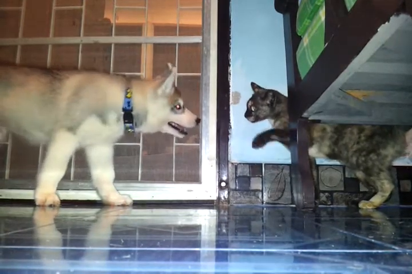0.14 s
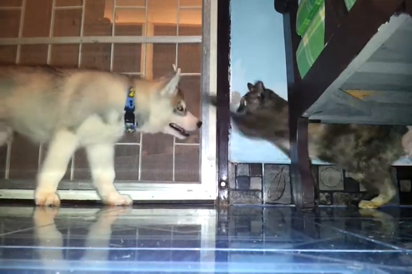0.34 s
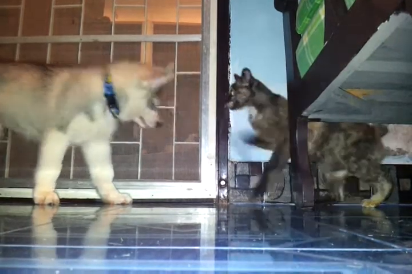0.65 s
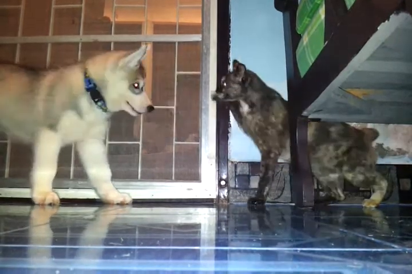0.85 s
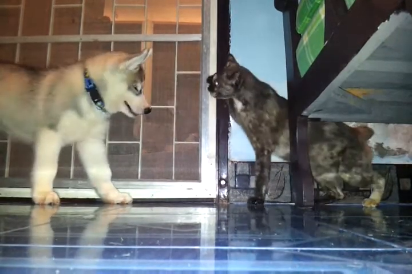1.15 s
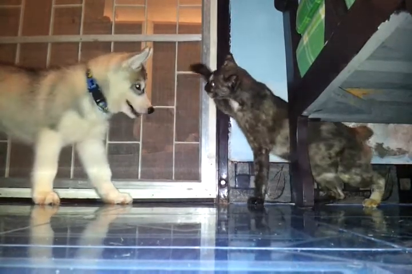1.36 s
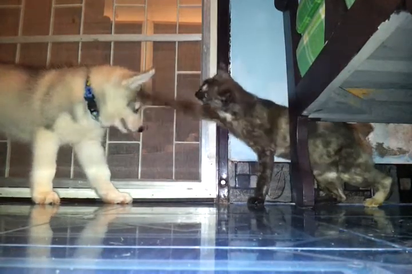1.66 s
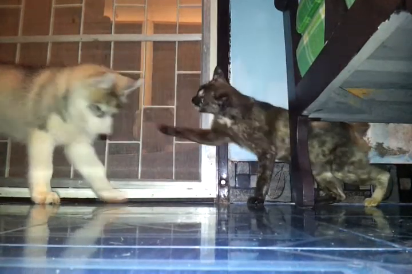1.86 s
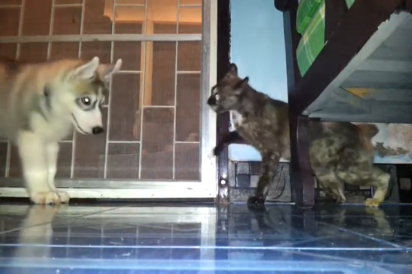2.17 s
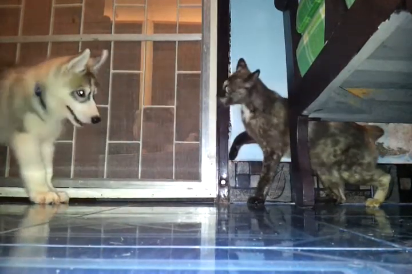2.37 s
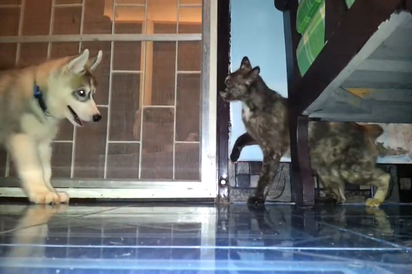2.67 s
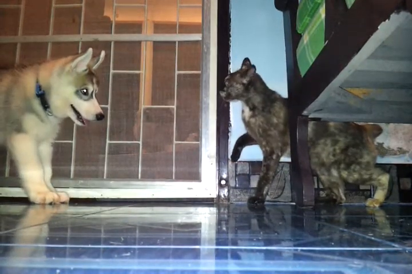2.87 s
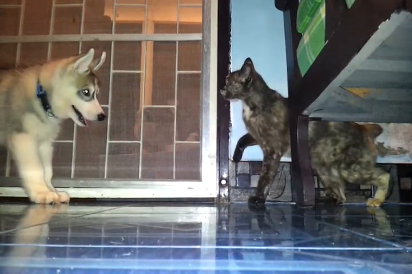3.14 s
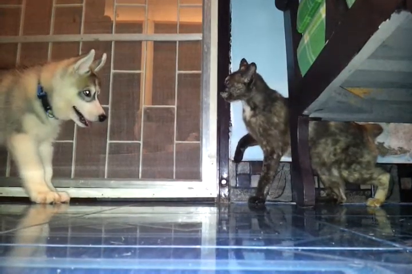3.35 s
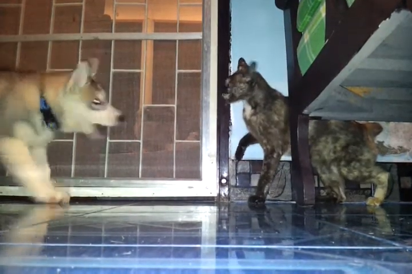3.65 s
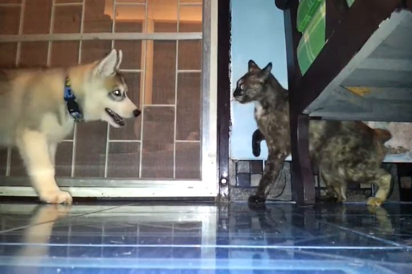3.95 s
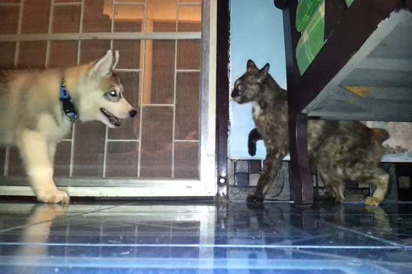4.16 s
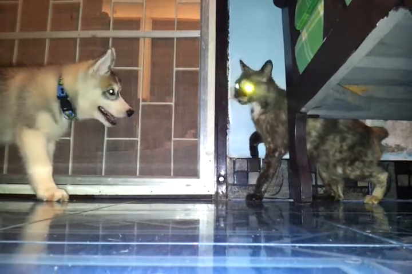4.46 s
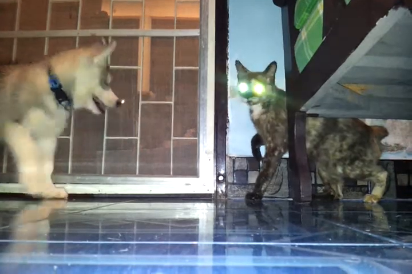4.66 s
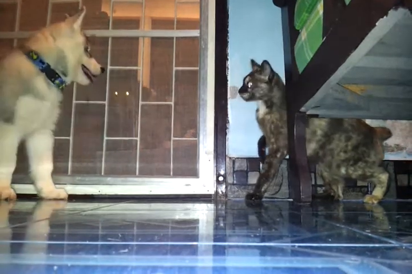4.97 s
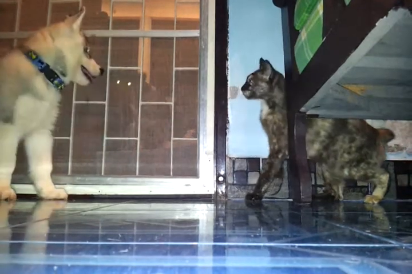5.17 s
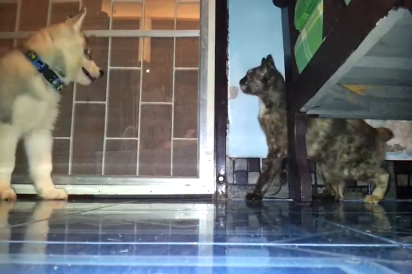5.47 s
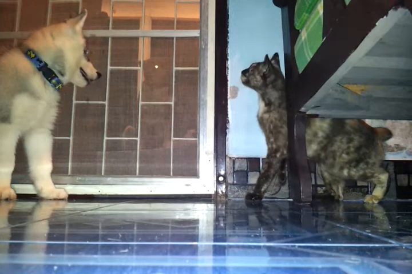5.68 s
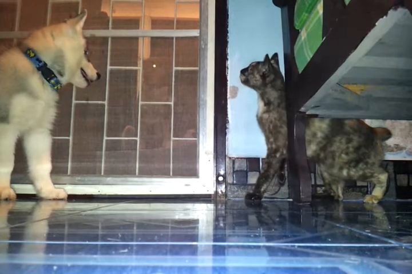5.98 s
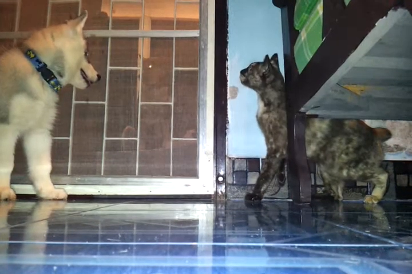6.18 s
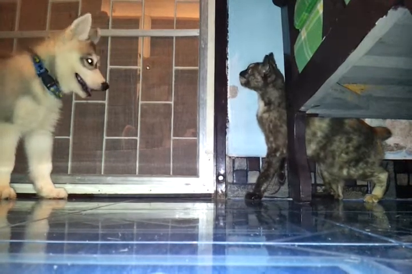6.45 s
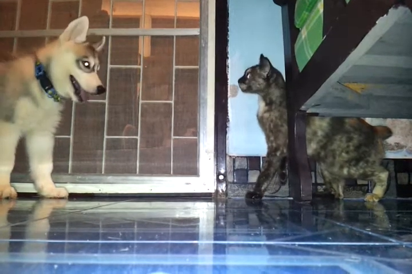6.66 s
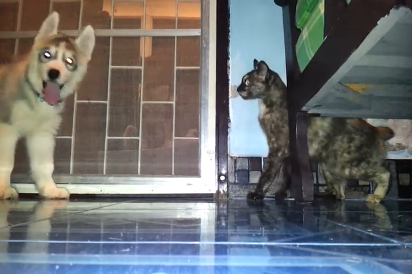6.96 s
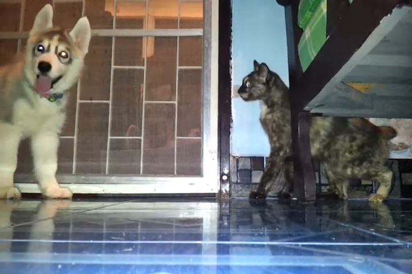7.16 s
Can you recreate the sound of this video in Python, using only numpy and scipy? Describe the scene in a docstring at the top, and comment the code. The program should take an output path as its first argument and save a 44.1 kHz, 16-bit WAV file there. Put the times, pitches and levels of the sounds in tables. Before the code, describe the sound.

A cat and a puppy face off in a reverberant tiled room, heard by a phone on the floor with narrow, slightly clipped sound. Steady hiss and quiet mains hum run throughout. From about 0.3 to 0.6 seconds, low, blunt air thumps strike the microphone; they return at 1.0 and cluster until about 2.2, with a last weak one near 2.5. Through them, from 1.15 to 2.25, the cat yowls: a thin, wavering tone climbing, brightening as its mouth opens, then sagging, with a breathy spit around 1.65. Relative quiet follows. At 3.65 the puppy barks once, short, harsh and overloaded, with a ringing echo. Tiny ticks appear at 4.2 and 4.7, then three sharp, wet smacking clicks at 5.0, 5.2 and 5.4, with small pops among them. Two faint hisses of air come around 5.7. The hum, swelling from about 4.7, dominates to the end at 7.3.

```python
"""A cat and a puppy face off in a tiled room, heard by a phone on the floor over room hiss and mains hum.
First a draught buffets the microphone: random pressure thumps over a slow sway. The cat yowls through it, a
harmonic source in throat and mouth resonances, and spits shaped noise. The puppy then barks once, rough pulses that
overload the phone. Small ticks come before and among three sharp smacking clicks, crackle ringing a small cavity (a
faint one leads); two faint hisses of air follow. The hum swells late; the room echoes and the input stage clips."""
import sys
import numpy as np
from scipy import signal
from scipy.fft import rfft, irfft
from scipy.io import wavfile
from scipy.ndimage import uniform_filter1d

SR = 44100
rng = np.random.default_rng(int(sys.argv[2]) if len(sys.argv) > 2 else 0)


def unload_wav(signal):
    """Save mono or channel-first audio to the path in sys.argv[1] as 16-bit WAV at rate SR, clipped to [-1, 1]."""
    wavfile.write(
        sys.argv[1],
        SR,
        np.round(np.clip(np.atleast_2d(signal).T, -1, 1) * 32767).astype(np.int16),
    )


N = 322812


def gain_of(db):
    """Amplitude ratio: 20 dB is a factor of ten."""
    return 10 ** (np.asarray(db) / 20)


def evened(x):
    """Normalisation: scales a signal to rms 1."""
    return x / np.sqrt(np.mean(x ** 2) + 1e-20)


def read(points, hz):
    """Interpolation of a spectrum along a logarithmic frequency axis."""
    f, value = np.transpose(points)
    return np.interp(np.log(hz + 1), np.log(f + 1), value)


def curves(rows):
    """Linear interpolation in time: gives the start time, then each column sample by sample."""
    s, *columns = np.transpose(rows)
    t = np.arange(s[0], s[-1], 1 / SR)
    return s[0], *(np.interp(t, s, c) for c in columns)


def add(mix, s, sound):
    """Superposition: sums a sound into the mix from s seconds."""
    part = mix[max(round(s * SR), 0):][:len(sound)]
    part += sound[:len(part)]


def resonate(x, hz, width):
    """Heterodyne resonance of gain 1: shifts hz (fixed or moving) to zero, smooths twice, shifts back."""
    turn = np.exp(2j * np.pi * np.cumsum(hz * np.ones(len(x))) / SR)
    r = np.exp(-np.pi * width / SR)  # width is that of each smoothing alone
    smooth = signal.lfilter([(1 - r) ** 2], [1, -2 * r, r * r], x / turn + 1e-18)
    return 2 * (turn * smooth).real


def through(x, modes):
    """Parallel formants: a sum of resonances with alternating sign."""
    return sum((-1) ** k * gain_of(db) * resonate(x, hz, w) for k, (hz, w, db) in enumerate(modes))


def wander(count, ms):
    """Low-passed random modulation of rms 1: noise averaged twice over ms."""
    size = max(round(ms * SR / 1000), 1)
    return evened(uniform_filter1d(uniform_filter1d(rng.standard_normal(count), size), size))


def coloured(spectrum):
    """Spectral shaping: white noise weighted in frequency, then scaled to rms 1."""
    hz = np.fft.rfftfreq(N, 1 / SR)
    return evened(irfft(rfft(rng.standard_normal(N)) * gain_of(read(spectrum, hz)), N))


def thump(hz):
    """Passing eddy: one pointed pressure dip with a few damped swings on both sides, centred in 40 ms."""
    u = np.pi * hz * (np.arange(1764) - 882) / SR
    return -np.cos(2.08 * u) * np.exp(-.9 * (np.sqrt(u ** 2 + 0.049) - np.sqrt(.08)))


def draught():
    """Turbulent pressure: random small eddies and rumble, a slow sway, and the strongest eddies as thumps."""
    # Strength of the air before gusts [start_s, level_db]
    strength = [(0.0, -65), (0.09, -46.5), (0.275, -45.5), (0.295, -32.5), (0.39, -35), (0.47, -27.5),
                (0.6, -31), (0.66, -46.5), (0.97, -40.5), (1.0, -29), (1.16, -33.5), (1.23, -28),
                (1.75, -31.5), (2.13, -30), (2.42, -43), (2.58, -44), (2.62, -53), (2.97, -51.5),
                (3.2, -62), (3.5, -65)]
    # Strongest eddies, one thump each [centre_s, level_db, pitch_hz (nominal)]
    eddies = [(0.3, -17.5, 170), (0.314, -11, 120), (0.364, -24, 170), (0.443, -19.5, 159),
              (0.478, -13.5, 242), (0.515, -17.5, 192), (0.54, -19, 204), (0.602, -19.5, 161),
              (1.005, -10.5, 165), (1.218, -23, 230), (1.229, -13, 197), (1.244, -16, 307),
              (1.281, -19.5, 200), (1.337, -16.5, 196), (1.425, -16.5, 214), (1.503, -10, 249),
              (1.535, -16, 184), (1.555, -15.5, 244), (1.642, -18.5, 186), (1.711, -11.5, 275),
              (1.776, -15.5, 216.7), (1.799, -15.5, 109.1), (1.959, -17, 177), (1.992, -16.5, 214),
              (2.106, -21, 161), (2.13, -9.5, 232), (2.161, -29, 178), (2.478, -21, 148)]
    # Relative spectrum of the rumble [frequency_hz, density_db]
    rumble_spectrum = [(20, -42), (50, -5), (100, 2.5), (170, 0), (330, -17), (500, -21.5), (700, -27.5),
                       (1200, -52.5), (2500, -84)]
    # Relative spectrum of the slow pressure sway [frequency_hz, density_db]
    sway_spectrum = [(10, -13), (25, -12), (45, -5), (80, -20), (200, -52)]
    s, air_db = curves(strength)
    count = len(air_db)
    t = s + np.arange(count) / SR

    # small eddies crowd around each strong one: 14.5 dB under its level, spread over 13 ms
    wakes = sum(gain_of(2 * (db - 14.5)) * np.exp(-((t - at) / 0.013) ** 2) for at, db, hz in eddies)
    gusty_db = air_db + 2.3 * wander(count, 25)
    rumble_db = 10 * np.log10(gain_of(2 * gusty_db) + wakes)  # powers add
    # the sway follows a share of the strength in dB, with gusts of its own
    sway_db = -32 + 0.43 * air_db + 7.5 * wander(count, 40.)

    sizes_hz, eddies_per_s = (94, 127, 170, 214, 280), 220
    small = np.zeros(N)
    for hz in sizes_hz:
        arrivals = rng.random(N) < eddies_per_s / len(sizes_hz) / SR
        train = arrivals * rng.standard_normal(N)
        small += signal.oaconvolve(train, thump(hz), "same")
    rumble = evened(evened(small) + 0.79 * coloured(rumble_spectrum))

    slow = np.clip((-32 - rumble_db) / 18, 0, 1)  # weaker air sheds larger, lower eddies
    dull = evened(resonate(rumble, 74.0, 120.))
    rumble = np.sqrt(1 - 0.71 * slow) * rumble[:count] + np.sqrt(0.83 * slow) * dull[:count]

    out = np.zeros(N)
    add(out, s, gain_of(rumble_db) * rumble)
    add(out, s, gain_of(sway_db) * coloured(sway_spectrum)[:count])
    for at, db, hz in eddies:
        add(out, at - 882 / SR, gain_of(db) * thump(hz))
    return out


def floor():
    """Continuous background: nearly steady room hiss and a mains hum that swells late."""
    # Partials of the hum, relative to its level [frequency_hz, level_db]
    hum_partials = [(50, -13), (100.2, 2), (200.4, -10.5), (300.6, -8.5), (375, -14)]
    # Course of the hum level, shared by all partials [start_s, level_db]
    hum_course = [(0, -61.5), (2.6, -57.5), (4.2, -60.5), (4.7, -55.5), (5.1, -52.5), (6.9, -51),
                  (7.32, -53)]
    # Relative spectrum of the hiss [frequency_hz, density_db]
    hiss_spectrum = [(20, -17.5), (48, -5), (66, -11), (100, -9), (160, -15), (308, -11), (420, -13),
                     (840, -12.5), (2070, -22.5), (5670, -25), (7340, -29), (9500, -93.5), (12400, -105),
                     (20900, -120)]
    t = np.arange(N) / SR
    hum = sum(gain_of(db) * np.sin(2 * np.pi * (hz * t + rng.random())) for hz, db in hum_partials)
    hum_db = np.interp(t, *np.transpose(hum_course)) + .4 * wander(N, 100)
    hum *= np.sqrt(2) * gain_of(hum_db)
    hiss_db = -48 + .5 * wander(N, 40)
    return gain_of(hiss_db) * coloured(hiss_spectrum) + hum


def yowl():
    """Source and filter: clean harmonics pass a fixed throat and a mouth that opens, under a breathy shine."""
    # Voice of the cat [start_s, pitch_hz, throat_db, mouth_db, mouth_hz]
    voice_path = [(1.14, 373.6, -63, -72, 1160), (1.18, 379.4, -46.5, -74, 1170),
                  (1.26, 429.5, -40.5, -75, 1300), (1.33, 446, -48, -72, 1300), (1.4, 458, -56, -64, 1350),
                  (1.47, 444, -40, -50, 1410), (1.52, 448.2, -44, -42.5, 1520),
                  (1.565, 429.5, -47, -49, 1380), (1.61, 432, -37, -46.5, 1730),
                  (1.66, 464.5, -55, -34, 2090), (1.72, 486.8, -69, -34.5, 2110),
                  (1.78, 473.4, -52, -45, 1550), (1.83, 458, -43, -45.5, 1810), (1.89, 474, -51, -41, 1910),
                  (1.95, 479.2, -45, -46.5, 1550), (2.03, 477.6, -48, -46.5, 1610),
                  (2.13, 463, -67, -59, 1450), (2.17, 446.5, -39.5, -59, 1300), (2.21, 421, -47, -66, 1220),
                  (2.24, 427, -74, -74, 1200)]
    # Moving mouth resonances [factor (on mouth_hz), width_hz, level_db (relative to mouth_db)]
    mouth_modes = [(1, 690, 3.5), (1.5, 720, -3)]
    s, hz, throat_db, mouth_db, mouth_hz = curves(voice_path)
    count = len(hz)
    shine_db = -3 + 1.1 * mouth_db  # the shine follows the mouth level
    turns = np.cumsum(hz * (1 + 0.0048 * wander(count, 5.2))) / SR  # phase in cycles, slightly jittered

    def partials(first, last, flutter_db, ms):
        """Fourier sum of harmonics, each fluttering in level on its own."""
        return sum(np.cos(2 * np.pi * k * turns) * gain_of(flutter_db * wander(count, ms))
                   for k in range(first, last + 1))

    low = partials(2, 6, 1.2, 25)
    edge = partials(7, 8, 3.4, 40)
    high = partials(10, 15, 3.5, 15)
    throat = resonate(low, 880, 300)
    mouth = sum(gain_of(db) * resonate(low, factor * mouth_hz, w) for factor, w, db in mouth_modes)
    mouth += gain_of(-24) * edge
    breathy = high + 3.8 * rng.standard_normal(count)
    shine = resonate(breathy, 6240, 590)
    voice = gain_of(throat_db) * throat - gain_of(mouth_db) * mouth + gain_of(shine_db) * shine
    voice *= np.sqrt(2) * gain_of(1.3 * wander(count, 39))
    return s, voice * signal.windows.tukey(count, .03)


def spit(length, db, hz, width):
    """Turbulent jet: a short puff of air as resonant noise that fades in and out."""
    count = round(length * SR)
    return gain_of(db) * evened(resonate(rng.standard_normal(count), hz, width)) * np.hanning(count)


def bark():
    """Driven vocal tract: jittered pulses and gated noise, forced through the open throat."""
    # Resonances of the open throat [frequency_hz, width_hz, level_db (relative)]
    throat_modes = [(69.5, 150, -9.5), (390, 190, -9.5), (968, 318, 4), (1290, 166, 0.5), (1644, 390, -2.5),
                    (2244, 530, -7.5), (2926, 670, -5), (3950, 870, -20.5), (6000, 2300, -24.5)]
    start_s, length_s, level_db, rough = 3.641, .165, 1.5, 0.68
    rise_s, hold_s, close_s, release_db_per_s = .026, .088, .025, 300.
    first_hz, sag_hz_per_s, lowest_hz = 1189.6, 3600., 870  # the pitch sags steadily until it rests

    t = np.arange(0, length_s, 1 / SR)
    effort = np.minimum(t / rise_s, 1) ** 1.6 * np.minimum((length_s - t) / close_s, 1)
    effort *= gain_of(level_db - release_db_per_s * np.maximum(t - hold_s, 0))
    hz = np.maximum(first_hz - sag_hz_per_s * t, lowest_hz)
    turns = np.cumsum(hz * (1 + .03 * wander(len(hz), 2.5))) / SR
    folds = sum(np.cos(2 * np.pi * k * turns) for k in range(1, 8))
    gate = 0.83 + np.exp(-(turns % 1) / 0.22)  # noise is strongest as each cycle begins
    puffs = gate * rng.standard_normal(len(hz))
    drive = (1 - rough) * evened(folds) + rough * evened(puffs)
    return start_s, effort * evened(through(drive, throat_modes))


def tick(db, hz, t60):
    """Damped free oscillation: a short exponential ring with a soft start."""
    t = np.arange(round(.06 * SR)) / SR
    return gain_of(db - 60 * t / t60) * np.sin(2 * np.pi * hz * t) * (1 - np.exp(-t / 0.00022))


def smack(length, db, hz, sizzle_db, ring_hz):
    """Cavity excitation: a seal tears open and crackles; gives the near sound and the narrow ring that carries."""
    # Resonances besides the cavity [frequency_hz, width_hz, level_db (relative to sizzle_db)]
    sizzle_modes = [(1455, 570, -1.5), (2300, 270, -12), (4600, 1700, -9), (5810, 900, -4.5),
                    (6770, 2750, -3)]
    u = np.arange(round(0.034 * SR)) / SR / length  # time in units of the length
    crackle = rng.standard_normal(len(u)) * gain_of(2.0 * wander(len(u), .3))
    crackle *= np.minimum(u / .3, 1) * np.exp(-np.maximum(u - .8, 0) / .3)
    highpass = signal.butter(N=2, Wn=600., btype="high", fs=SR, output="sos")
    crackle = signal.sosfilt(highpass, crackle)  # too small to push bass
    near = resonate(crackle, hz, 1586.0) + gain_of(sizzle_db) * through(crackle, sizzle_modes)
    strongest = np.argmax(abs(crackle))
    pop = np.sqrt(np.sum(near ** 2)) * signal.unit_impulse(len(u), strongest)
    far = gain_of(10.5) * resonate(pop, ring_hz, 480.) + gain_of(-4.5) * near
    return gain_of(db) * np.array([near, far]) / np.sqrt(np.mean(near[u < 1] ** 2))


def room(x):
    """Reverberation: sparse random-sign taps, each band decaying at its own speed, and a few wall echoes."""
    # Decay time by band [frequency_hz, t60_s]
    decay = [(100, 0.46), (300, 0.39), (950, 0.6), (1400, 0.64), (2300, 0.53), (3150, 0.58), (4000, 0.36),
             (7000, 0.49)]
    # Single early echoes, relative to the unit-energy tail [delay_s, level_db]
    walls = [(0.0173, -5), (.032, -4.5), (.052, -10.5)]
    taps = np.zeros(SR)
    at = np.arange(300, SR - 30, 30)
    taps[at + rng.integers(0, 30, at.shape)] = rng.choice([-1., 1.], at.shape)
    hz, t, z = signal.stft(taps, SR, nperseg=256)
    decayed = z * gain_of(-60 * t / read(decay, hz)[:, None])
    tail = signal.istft(decayed, SR, nperseg=256)[1]
    tail = tail / np.linalg.norm(tail)
    for delay, db in walls:
        add(tail, delay, gain_of([db]))
    return signal.fftconvolve(x, tail)[:N]


def scene():
    """Superposition at the microphone: direct sounds, their echoes, the draught and the background."""
    # Short hisses of air, the loudest a spit of the cat
    # [start_s, length_s, level_db (before the fades), centre_hz, width_hz]
    hisses = [(1.47, 0.1, -48, 5400, 3500), (1.64, 0.086, -37, 3880, 6060), (2.199, 0.056, -51, 5300, 900),
              (5.696, 0.043, -53.5, 6400, 1500), (5.75, .025, -51, 6400, 1500)]
    # Small ticks and pops [start_s, level_db (before the soft start), pitch_hz, t60_s]
    small_ticks = [(4.222, -28, 1160, 0.014), (4.222, -30, 3690, 0.0053), (4.677, -17.5, 5150, 0.0032),
                   (4.769, -35, 6160, 0.0059), (5.122, -39, 4020, .015), (5.2129, -15.5, 733, 0.036),
                   (5.397, -15.5, 880, 0.0097)]
    # Smacks, each a short crackling burst
    # [start_s, length_s, level_db (near sound), cavity_hz, sizzle_db (relative), ring_hz]
    bursts = [(4.978, 0.0018, -38, 6300, -10, 6300), (4.983, 0.0031, -18.5, 3070, -7.5, 3070),
              (5.193, 0.014, -14, 3440, -3.5, 3330), (5.3878, 0.0089, -15, 3380, -6, 3320)]
    cat, dog, clicks, carried = np.zeros((4, N))
    add(cat, *yowl())
    for s, *row in hisses:
        add(cat, s, spit(*row))
    add(dog, *bark())
    for s, *row in small_ticks:
        add(clicks, s, tick(*row))
    for s, *row in bursts:
        near, far = smack(*row)
        add(clicks, s, near)
        add(carried, s, far)  # heard only by way of the room
    echoes = room(gain_of(-8.0) * cat + gain_of(-11) * dog + gain_of(-12.0) * carried)
    return (cat + dog + clicks + echoes + draught() + floor())[None]


def record(dry):
    """Overload and band limiting: uneven clipping, a narrow voice band, clipped overshoot, a last low-pass."""
    mic_clip, file_clip = 0.68, 0.76  # of full scale
    stop_hz, edge_hz = 9125, 15850  # stop-band edge of the voice band; final cutoff
    clipped = np.clip(dry, -.95 * mic_clip, mic_clip)
    voice_band = signal.cheby2(N=10, rs=55, Wn=stop_hz, fs=SR, output="sos")
    narrow = signal.sosfilt(voice_band, clipped)
    stored = np.clip(narrow, -file_clip, file_clip)
    lowpass = signal.firwin(511, edge_hz, window=("kaiser", 9), fs=SR)
    return signal.oaconvolve(stored, lowpass[None], "same")


dry = scene()
out = record(dry)
unload_wav(out)
```